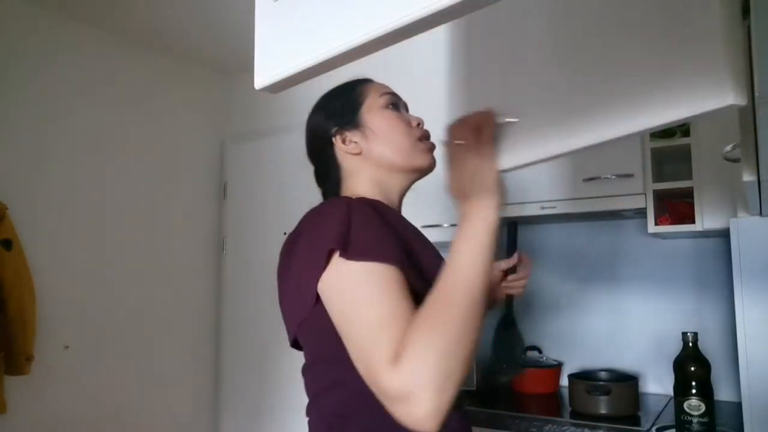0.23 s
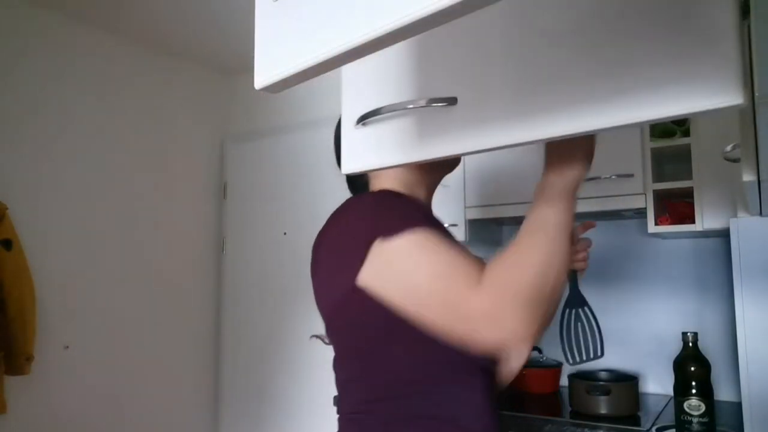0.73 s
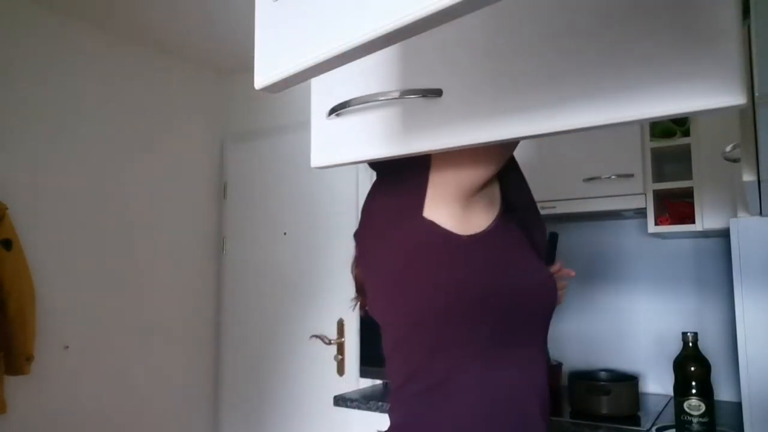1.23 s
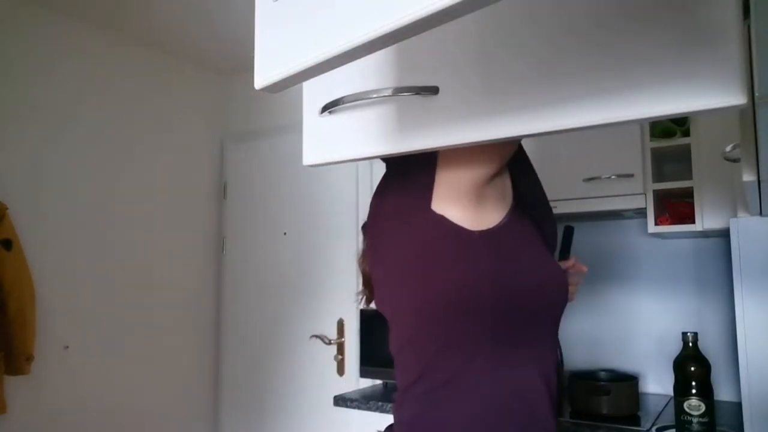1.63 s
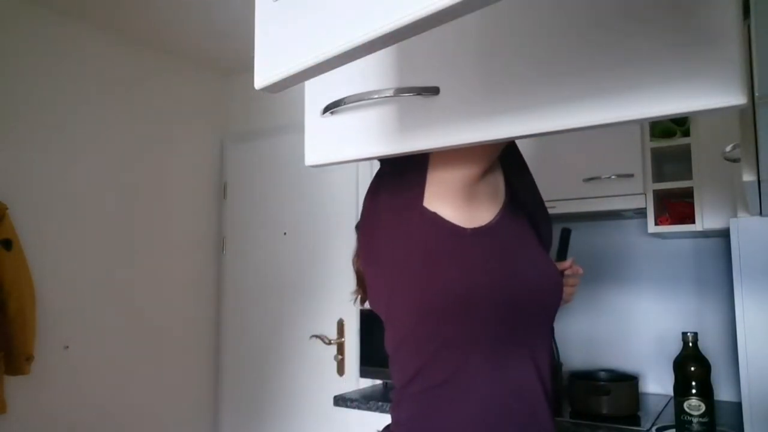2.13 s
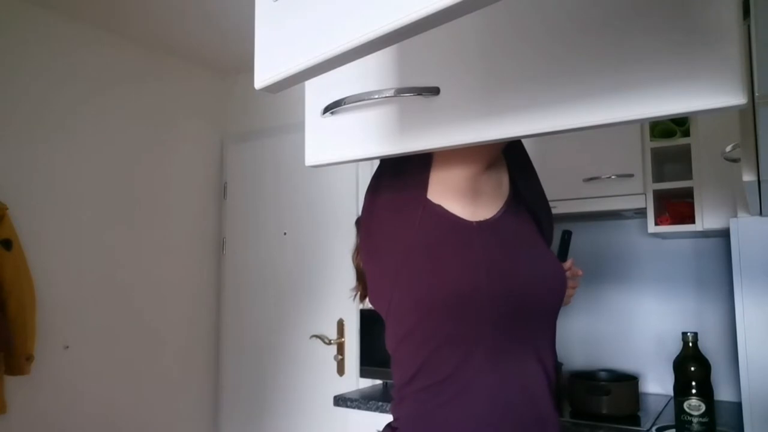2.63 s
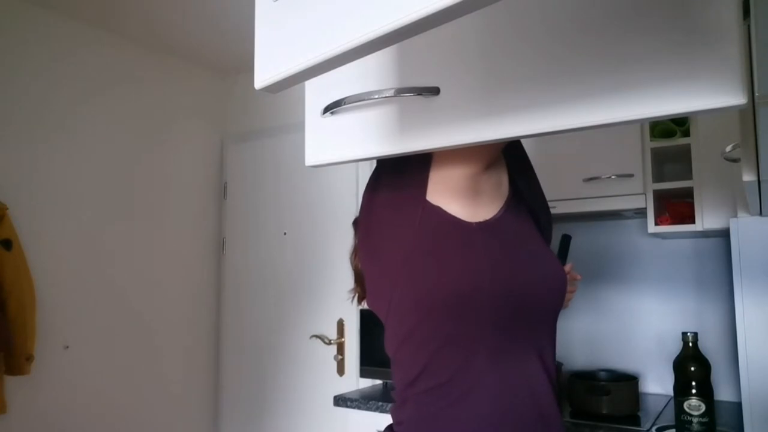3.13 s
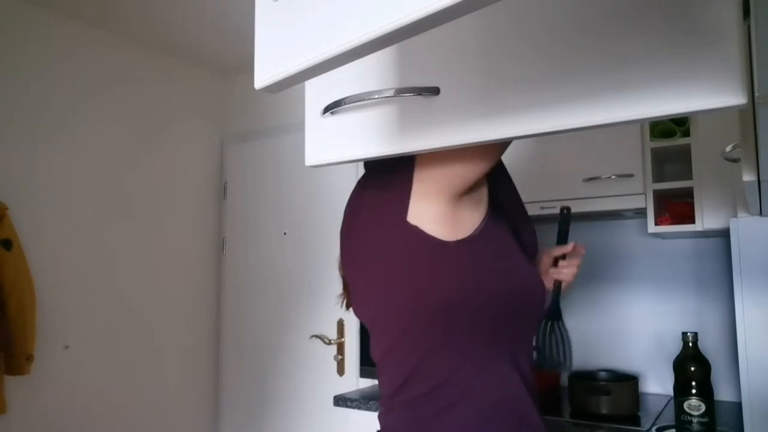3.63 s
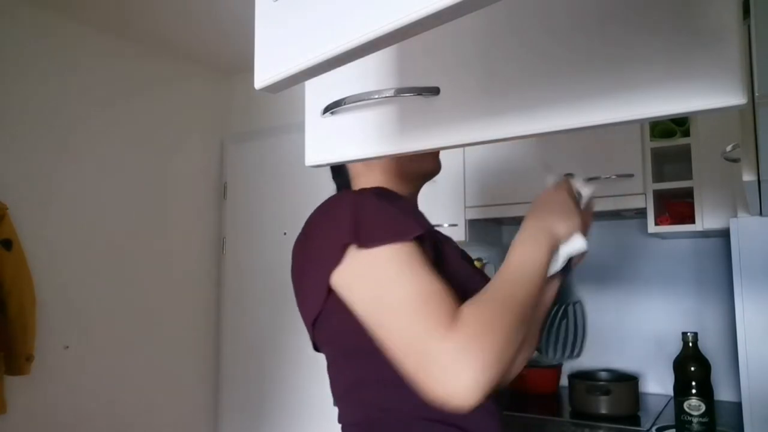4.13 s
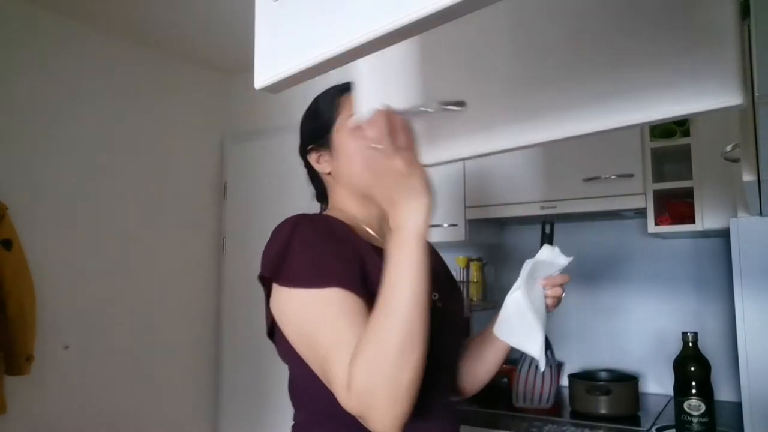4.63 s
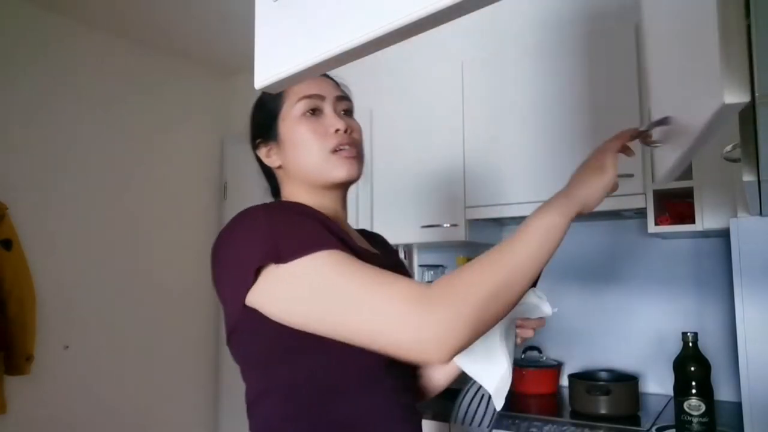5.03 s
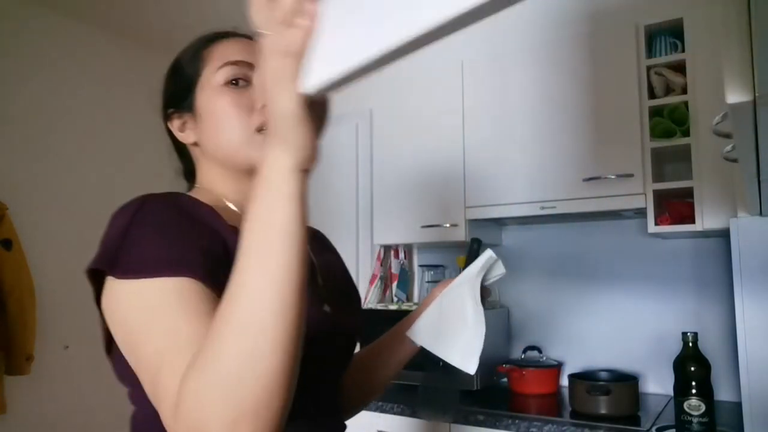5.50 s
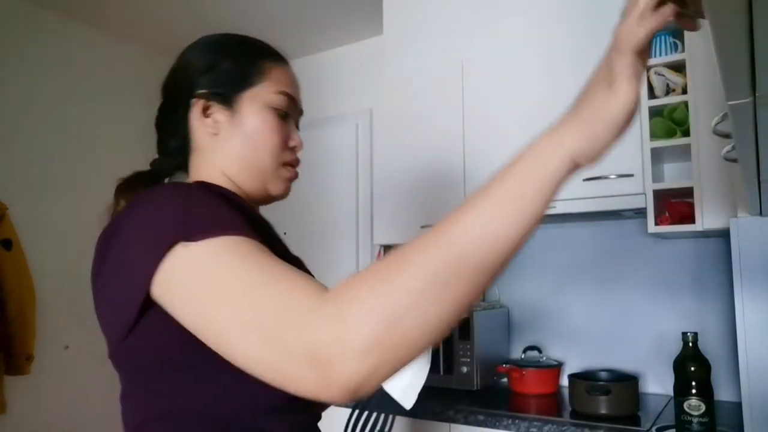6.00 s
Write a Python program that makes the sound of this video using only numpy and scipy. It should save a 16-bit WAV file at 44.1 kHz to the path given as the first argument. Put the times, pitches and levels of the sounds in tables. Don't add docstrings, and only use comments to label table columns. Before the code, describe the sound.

Quiet kitchen with fridge hum; a cupboard catch snaps, paper towel rustles and tears, knuckles tap a door, then two cupboard doors slam very loudly.

```python
import sys
import numpy as np
from scipy import signal
from scipy.fft import rfft, irfft, next_fast_len
from scipy.io import wavfile
from scipy.ndimage import uniform_filter1d, map_coordinates

SR = 44100
rng = np.random.default_rng(int(sys.argv[2]) if len(sys.argv) > 2 else 0)


def makeup_ratio(level_db):
    decades = np.asarray(level_db, float) / 20
    return 10 ** decades


def digitize_waveform(pressure):
    field = np.atleast_2d(pressure).T
    bounded = np.clip(field, -1, 1)
    quanta = np.round(bounded * 32767).astype(np.int16)
    wavfile.write(sys.argv[1], SR, quanta)


N = 276066

# start_s, level_db, push_ms, crack_db
TAP_CONTACTS = [
    (4.621, -33, 0.12, -40),
    (4.641, -30.5, 0.23, -32),
    (4.665, -27, 0.64, -26),
    (4.695, -30, 0.64, -32),
]
SLAM_1_CONTACTS = [(5.368, -48, 0.12, -13), (5.381, -19, 0.38, -25), (5.394, -6, 0.25, -14),
                   (5.4015, -1.5, 0.39, -9), (5.42, -23.5, 0.11, -6), (5.455, -12, 0.33, -9),
                   (5.49, -21.5, 0.24, 1.5), (5.587, -19.5, 0.33, -9.5), (5.64, -13.5, 3.2, -41)]
SLAM_2_CONTACTS = [(5.915, -43.5, 0.25, 10), (5.93, -40.5, 0.63, -10), (6.004, -25, 1, -16),
                   (6.011, -40, 0.4, -18), (6.0178, -3, 0.14, -6.5), (6.0275, -10.5, 0.25, -32),
                   (6.063, -23.5, 0.42, -7), (6.098, -31, 0.46, -17), (6.128, -14, 0.4, -3),
                   (6.137, -24.5, 0.13, -8), (6.19, -20, 0.4, -6)]
# pitch_hz, level_db, t60_s
LIFT_DOOR_MODES = [(83.4, -4.5, 0.37), (113, -6, 0.41), (185, 3, 0.64), (235, -5.5, 0.5), (287, -11, 0.25),
                   (470, -1, 0.38), (559.6, 9, 0.3), (624, 6, 0.23), (940, -5, 0.27)]
# pitch_hz alone, then level_db, t60_s
DOOR_1_PITCHES = [58.5, 116, 173, 249, 300, 360, 467, 495, 535, 634, 694, 829, 915, 964, 1260, 1696]
DOOR_1_RINGS = [(6, 0.28), (-8, 0.65), (4, 0.38), (-18, 0.57), (-9, .3), (-15, 0.4), (-4.5, 0.64),
                (-12, 0.36), (-12.5, 0.69), (-7.5, .45), (-7, 0.46), (-1, 0.15), (-12, .5), (-18, 0.57),
                (0.5, 0.29), (-4.5, 0.38)]
DOOR_2_PITCHES = [54, 75, 114, 152, 182, 278, 347, 430, 483, 602, 664, 872, 940, 1300, 1669]
DOOR_2_RINGS = [(-1.5, 1), (-2, 0.11), (9.5, 0.17), (-2, 1), (-3.5, 0.39), (-4, 0.42), (4.5, 0.078),
                (-5.5, 0.31), (-17, 0.7), (1.5, 0.13), (-11, .35), (-7.5, 0.2), (0.5, 0.058), (1.5, 0.046),
                (-5, 0.17)]
# frequency_hz, t60_s
DENSE_MODES = [(40, -37), (60, -6), (120, 3.5), (400, -15.5), (1000, -18), (2500, -10.5), (5000, -56)]
DENSE_DECAY = [(60, 0.083), (500, 0.67), (2000, 0.093)]
# frequency_hz, t60_s
EDGE_CRACK = [(300, 2), (900, 6.5), (1900, 1), (3000, -2.5), (4500, -15), (6000, -24.5), (8000, -23),
              (12000, -25), (16000, -53)]
EDGE_CRACK_DECAY = [(1000, 0.36), (3000, 0.32), (6000, 0.47), (12000, 0.19)]
# frequency_hz, left_right_db
DOOR_DIFFERENCE = [(60, -15), (200, -13.5), (500, -4), (1500, 3)]
DOOR_BALANCE = [(300, -1), (700, -1.5), (1400, -1.5), (2500, 3.5), (5000, 3.5), (9000, -1)]

# start_s, level_db, rise_s, t60_s, left_right_db
CATCH_SNAP = [(.3065, -27.5, 0.002, 0.31, 2)]
CATCH_RING_ON = [(.31, -25, 0.013, 0.71, 2)]
HANDLE_SNAP = [(4.641, -28, 0.00062, 0.45, 0)]
KNUCKLE_SNAP = [(4.621, -30.5, 0.0023, 0.153, 0)]
HINGE_SNAPS = [
    (5.128, -35.5, 0.0021, 0.55, 0.0078),
    (5.19, -46, 0.0037, 0.58, 0.0055),
]
TICK_SNAPS = [
    (1.765, -52, .0005, 0.057, 0),
    (4.934, -49, .0005, 0.054, 0),
    (5.588, -40, .002, 0.11, 0),
    (6.018, -39, .0003, .03, 0.0026),
]
# centre_hz, width_hz, level_db
CATCH_RESONANCES = [(1336, 200, 10), (1690, 540, 11), (1840, 420, 1.5), (2060, 190, 10), (3600, 650, 3),
                    (5500, 480, -13), (4440, 830, -38), (7060, 520, -3), (8230, 490, -5),
                    (10100, 980, -10.5), (11300, 1200, -9), (13600, 1500, -24.5)]
HANDLE_RESONANCES = [(1320, 210, -5), (1700, 1100, -2.5), (2480, 300, -1.5), (4270, 1300, -14.5),
                     (10400, 2700, -25)]
HINGE_RESONANCES = [(228, 140, 13.5), (740, 430, 7), (1810, 370, 6.5), (2690, 670, 1.5), (3520, 400, -3),
                    (6000, 2000, -17.5)]
# pitch_hz, level_db, t60_s
SPRING_MODES = [(1254, -14, 0.22), (1534, -4, 0.27), (1710, -10, 0.6), (1720, -7, 0.28), (1800, -3, 2.1),
                (1880, -11, 0.24), (2035, -4, 0.32), (2153, -13, 0.47), (2439, -6, 0.31), (2923, -24, 0.72),
                (3450, -19, 0.7), (3530, -17, 0.22), (3700, -13, 0.49), (3940, -20, 0.5)]
HANDLE_BAR_MODES = [(990, -6, .15), (1265, -6, .25), (1620, 6, 0.16), (1730, -9, .25), (2073, -6, .1),
                    (2396, -4, .25)]

# peak_s, level_db, swell_s, fade_s, body_db; swell_s and fade_s last 20 dB
TEAR_STROKES = [(1.33, -50.5, 0.022, 0.14, -4.5), (1.392, -43, 0.067, 0.12, -6),
                (1.535, -45, 0.022, 0.22, -10.5), (1.572, -40.5, 0.079, 0.093, -15),
                (1.70, -51.5, 0.057, 0.077, -17), (1.755, -45, 0.014, 0.11, -22),
                (1.79, -42, 0.026, 0.14, -9), (1.915, -53, 0.056, 0.042, -24),
                (3.075, -67.5, 0.061, 0.07, 1), (3.14, -53, 0.017, 0.094, -20),
                (3.345, -53, .03, 0.25, -10), (3.41, -45.5, 0.087, 0.21, -3),
                (3.48, -45.5, 0.098, 0.12, -4.5), (3.58, -45.5, 0.1, 0.21, -5.5),
                (3.69, -49.5, 0.14, 0.16, -15), (3.87, -62, 0.062, 0.079, 1), (3.98, -64, 0.22, 0.1, 4.5),
                (4.13, -67, 0.034, .1, 11.5), (4.21, -52.5, 0.13, 0.1, 2), (4.31, -44.5, 0.12, 0.17, -5.5),
                (4.4, -52, 0.15, 0.047, -11), (4.94, -62.5, 0.059, 0.23, -9)]
SWISH_STROKES = [(.01, -53.5, 0.17, 0.18, -0.5), (.21, -70, 0.097, 0.041, 14.5),
                 (.26, -62.5, 0.075, 0.13, 1.5), (.478, -49.5, 0.044, 0.12, -0.5),
                 (.56, -55, 0.26, 0.083, -3.5), (.735, -73.5, 0.036, 0.073, 18),
                 (2.03, -63, 0.051, 0.068, -3), (3.8, -69, 0.16, 0.082, 14.5), (4.85, -61, 0.086, 0.25, -4),
                 (5.72, -65.5, 0.048, 0.21, 10.5), (5.85, -50, 0.24, 0.23, -12),
                 (5.926, -46.5, 0.081, 0.058, -6), (6.0, -53, 0.11, 0.045, 6)]
# frequency_hz, density_db_per_hz
PAPER_SPECTRUM = [(900, -58), (1500, -10.5), (2000, 1), (3100, 4.5), (4000, 4.5), (4900, 6.5), (5400, -13),
                  (6500, -70)]
BODY_SPECTRUM = [(150, -53), (350, -7), (700, -4.5), (1500, -4.5), (2200, -11), (3500, -32)]
TOP_SPECTRUM = [(4200, -58), (5300, 2), (7000, 4), (8000, 0.5), (10000, 0), (12000, -3.5), (13000, -16),
                (15000, -19), (16000, -29)]
CLOTH_SPECTRUM = [(590, -38), (1000, 1), (1380, -1), (1520, -1.5), (2630, 9), (2790, 8.5), (8000, -16.5),
                  (10400, -45), (17600, -120)]
# frequency_hz, left_right_db
PAPER_BALANCE = [(1000, 2.2), (5000, 3), (9000, -1)]

# peak_s, strength_db, swell_s, fade_s
CUP_SHAKES = [
    (5.51, -38.5, 0.11, 0.13),
    (5.575, -47.5, 0.06, 0.1),
    (6.09, -38, 0.05, 0.21),
    (6.165, -45.5, 0.23, 0.3),
    (6.21, -52, .04, .25),
]
# centre_hz, width_hz, level_db
CUP_MODES = [(2800, 25, -2), (2920, 60, -10), (3030, 45, -1), (3120, 40, 0), (3210, 60, -6),
             (3320, 60, -11), (3600, 60, -6), (3710, 50, -7), (4020, 40, -13)]
GLASS_MODES = [
    [(4624, 14, -10), (5176, 10, 0), (5572, 12, -7)],
    [(7550, 22, 0), (7973, 20, -9), (8200, 30, -21)],
]
# start_s, end_s, wide_glass_db, thin_glass_db
GLASS_TOUCHES = [(5.463, 5.5, -67, -51), (5.495, 5.544, -51.5, -49), (5.548, 5.602, -55, -62),
                 (6.087, 6.12, -49, -47), (6.135, 6.209, -54, -49), (6.205, 6.255, -63, -64)]
# start_s, length_s, pitch_hz, level_db
HOLLOWS = [
    (1.529, 0.13, 453, -53),
    (5.869, 0.078, 517, -49),
]
# start_s, pitch_hz, level_db, t60_s
SHELF_THUDS = [(0.0, 151, -32.5, 0.16), (0.071, 111.2, -37.5, 0.56), (.11, 139.3, -37.5, 0.44),
               (0.201, 350, -49, 0.1), (0.721, 235, -42.5, 0.3), (0.76, 100, -43, 0.26),
               (0.901, 322, -53.5, 0.68), (1.071, 310, -49, 0.13), (1.299, 217, -46, 0.33),
               (1.79, 134, -66, 0.17), (3.402, 210.3, -41, 0.34), (3.491, 196, -47, 0.29),
               (3.77, 217, -41.5, 0.28), (3.831, 197, -47, 0.21), (3.829, 347, -49, 0.25),
               (4.2, 542, -44, 0.25), (5.131, 132.6, -40, 0.32), (5.138, 237.4, -44, 0.15),
               (5.186, 470, -45, 0.16), (5.204, 121, -36, 0.11), (5.25, 73.4, -41, 0.18)]
# frequency_hz, t60_s
KITCHEN_DECAY = [(100, 0.31), (1000, 0.23), (4000, 0.13), (12000, 0.085)]

# time_s, pitch_hz, level_db
COMPRESSOR_RUMBLE = [(0.0, 48.4, -36.5), (0.47, 45.8, -49), (0.72, 45.7, -38.5), (1.58, 43.8, -49),
                     (2.23, 39.5, -38.5), (2.6, 41.5, -49.5), (3.08, 44.4, -55), (3.17, 47, -67),
                     (3.47, 43, -46), (3.57, 44, -63), (3.69, 45.4, -49), (3.76, 46.6, -64),
                     (3.94, 43.2, -56), (4.77, 41.8, -53.5), (4.93, 46, -55), (5.3, 49.9, -53)]
SHAKEN_CABINET = [
    (5.7, 47.4, -43.5),
    (6.3, 49, -35),
]
# time_s, pitch_hz, level_db
FRIDGE_HUM = [(0, 163, -63), (.8, 156.9, -57.5), (1.5, 154.1, -60), (2, 152.4, -53.5), (2.7, 149.8, -66),
              (3.5, 154, -52.5), (4, 156.4, -57), (4.5, 162.7, -67), (5.3, 163, -64)]
# frequency_hz, density_db_per_hz
AIR_HISS = [(30, -42.5), (50, -19.5), (75, -19), (110, -17.5), (170, -17), (250, -23), (600, -26),
            (1000, -28), (1600, -33.5), (2500, -36), (4800, -42), (5600, -48.5), (12000, -52.5),
            (15800, -57)]
# frequency_hz, correlation
HISS_LIKENESS = [(60, 0.45), (180, 0.8), (550, 0.39), (1650, -0.18), (4970, 0.016), (15000, -0.09)]


def panel(contacts, modes, dense_db):
    body, cracks = np.zeros((2, N)), np.zeros((2, N))
    t = np.arange(SR) / SR

    def ring():
        total = 0
        for k, (hz, level_db, t60) in enumerate(modes):
            envelope = makeup_ratio(level_db + rng.normal() - 60 * t / t60)
            total = total + (-1) ** k * envelope * np.sin(2 * np.pi * hz * t)
        return total

    for s, db, push_ms, crack_db in contacts:
        push = t[:600] * np.exp(-1000 * t[:600] / push_ms)
        push = push[None] / push.sum()
        mid_side = 0.5 * np.array([ring(), 0.54 * ring()]) + makeup_ratio(dense_db) * tail(DENSE_DECAY, DENSE_MODES)
        add(body, s, makeup_ratio(db) * signal.fftconvolve(mid_side, push, axes=1)[:, :SR])
        # 0.33 dB per octave above 3 kHz, per dB of lost strength
        colour = [(hz, g + 0.33 * db * max(np.log2(hz / 3000), 0)) for hz, g in EDGE_CRACK]
        add(cracks, s, makeup_ratio(db + crack_db + 22) * tail(EDGE_CRACK_DECAY, colour))
    side = filtered(body[1], lambda f: makeup_ratio(along(DOOR_DIFFERENCE, f)))
    return body[0] + np.array([side, -side]) + cracks


def doors():
    door_1 = [(hz, *ring) for hz, ring in zip(DOOR_1_PITCHES, DOOR_1_RINGS)]
    door_2 = [(hz, *ring) for hz, ring in zip(DOOR_2_PITCHES, DOOR_2_RINGS)]
    x = panel(TAP_CONTACTS, LIFT_DOOR_MODES, dense_db=26.5)
    x += panel(SLAM_1_CONTACTS, door_1, dense_db=24.5)
    x += panel(SLAM_2_CONTACTS, door_2, dense_db=27)
    return balanced(x, DOOR_BALANCE)


def click(events, resonances):
    t, x = np.arange(SR // 2) / SR, np.zeros((2, N))
    for s, db, rise, t60, pan_db in events:
        burst = rng.standard_normal((2, len(t))) * makeup_ratio(np.array([[pan_db / 2], [-pan_db / 2]]))
        decay = makeup_ratio(db + 0.5 - 60 * t / t60) + makeup_ratio(db + 4 - 60 * t / 0.019)
        add(x, s, burst * decay * (1 - np.exp(-t / rise)))
    return resonant(x, resonances)


def struck(s, db, rise, modes):
    t, out = np.arange(SR // 2) / SR, np.zeros((2, N))
    for hz, level_db, t60 in modes:
        phase = 2 * np.pi * rng.random() + rng.normal(size=(2, 1))
        envelope = makeup_ratio(db + level_db - 60 * t / min(t60, 0.7)) * (1 - np.exp(-t / rise))
        add(out, s, envelope * np.sin(2 * np.pi * hz * t + phase))
    return out


def small_parts():
    x = click(CATCH_SNAP, CATCH_RESONANCES) + click(CATCH_RING_ON, [(1750, 380, 0.016)])
    x += struck(0.39, -48, 0.0025, SPRING_MODES)
    x += click(HANDLE_SNAP, HANDLE_RESONANCES)
    x += click(KNUCKLE_SNAP, [(1300, 430, 10.5), (1670, 600, -6)])
    x += struck(4.641, -43.5, 0.002, HANDLE_BAR_MODES)
    x += click(HINGE_SNAPS, HINGE_RESONANCES)
    return x + click(TICK_SNAPS, [(5000, 3100, -1.5), (10900, 8600, -14)])


def rustle():
    power = np.zeros((4, N))
    for strokes, paper_db, cloth_db, top_db in [(TEAR_STROKES, 0, -99, -4.5), (SWISH_STROKES, -8, 0, -12)]:
        for s, db, swell, fade, body_db in strokes:
            crisp_db = 3.5 * (3 < s < 4.05)
            gains = makeup_ratio(np.array([[paper_db], [cloth_db], [body_db], [top_db + crisp_db]]))
            power += (swells(s, db, swell, fade) * gains) ** 2
    paper, cloth, body, top = uniform_filter1d(np.sqrt(power), size=600)

    snapping = rng.random((2, N)) < 2500 / SR
    snaps = snapping * rng.standard_normal((2, N)) * makeup_ratio(2.6 * rng.random((2, N)))
    source = unit(snaps) * 0.5 + rng.standard_normal((2, N))
    source *= makeup_ratio(0.55 * wobble(40) + 0.53 * wobble(140))
    z = signal.stft(source, nperseg=256)[2]
    folds = uniform_filter1d(rng.standard_normal(z.shape[1:]), size=6, axis=0)
    folds = uniform_filter1d(folds, size=10, axis=1)
    source = signal.istft(z * makeup_ratio(1.93 * unit(folds)), nperseg=256)[1][:, :N]

    def band(spectrum):
        return unit(filtered(source, lambda f: makeup_ratio(along(spectrum, f))))

    x = paper * band(PAPER_SPECTRUM) + cloth * band(CLOTH_SPECTRUM)
    x += body * band(BODY_SPECTRUM) + top * band(TOP_SPECTRUM)
    x = pair(makeup_ratio(3) * x, [(300, 1.0), (1500, 0.024), (5000, 0.031)])
    return balanced(x, PAPER_BALANCE)


def crockery():
    t = np.arange(N) / SR

    def chatter(modes):
        touches = (rng.random(N) < 900 / SR) * rng.standard_normal((2, N))
        return unit(resonant(touches, modes))

    out = sum(swells(*shake) for shake in CUP_SHAKES) * chatter(CUP_MODES)
    clear = 0.7
    for k, modes in enumerate(GLASS_MODES):
        touching = np.max([makeup_ratio(row[2 + k]) * ((t > row[0]) & (t < row[1])) for row in GLASS_TOUCHES], axis=0)
        ears = np.array([[0], [1]])
        tone = unit(sum(makeup_ratio(g) * np.sin(2 * np.pi * hz * t + ears) for hz, _, g in modes))
        singing = clear * tone + np.sqrt(1 - clear ** 2) * chatter(modes)
        out += uniform_filter1d(touching, size=900) * singing
    for s, length, hz, db in HOLLOWS:
        swell = np.hanning(round(length * SR))
        add(out, s, makeup_ratio(db) * swell * np.sin(2 * np.pi * hz * t[:len(swell)]))
    return out


def thuds():
    out, t = np.zeros((2, N)), np.arange(SR // 2) / SR
    for s, hz, db, t60 in SHELF_THUDS:
        beat = 1 + 0.5 * np.sin(2 * np.pi * (hz * 0.091 * t + rng.random()))
        envelope = makeup_ratio(db - 60 * t / t60) * (1 - np.exp(-t / 0.0057))
        add(out, s, envelope * beat * np.sin(2 * np.pi * hz * t))
    return out


def fridge():
    t = np.arange(N) / SR

    def curves(rows):
        time, *columns = np.transpose(rows)
        return [np.interp(t, time, column) for column in columns]

    def line(hz):
        return np.sqrt(2) * np.sin(2 * np.pi * np.cumsum(hz) / SR) * makeup_ratio(0.24 * wobble(20))

    def narrow(hz, width_hz):
        return unit(filtered(rng.standard_normal(N), lambda f: 1 / (1 + ((f - hz) / width_hz) ** 2)))

    rumble_hz, rumble_db = curves(list(COMPRESSOR_RUMBLE) + list(SHAKEN_CABINET))
    hum_hz, hum_db = curves(FRIDGE_HUM)
    x = makeup_ratio(rumble_db + 1.2 * wobble(8.2)) * line(rumble_hz + 0.8 * wobble(1.9))
    x += makeup_ratio(hum_db + 1.5 * wobble(9.2)) * line(hum_hz + 1.75 * wobble(20))
    x += makeup_ratio(-60 + 1.6 * wobble(2.7)) * line(hum_hz / 2 + 2 * wobble(6.9))
    return x + makeup_ratio(-65.5) * narrow(101.2, 1.8) + makeup_ratio(-71) * narrow(626, 3.3) + makeup_ratio(-72) * narrow(349.3, 1)


def air_hiss():
    hiss = unit(filtered(rng.standard_normal((2, N)), lambda f: makeup_ratio(along(AIR_HISS, f))))
    hiss *= makeup_ratio(0.5 * wobble(4))
    return makeup_ratio(-53) * pair(hiss, HISS_LIKENESS) * makeup_ratio(np.array([[0.8], [-0.8]]))


def unit(x):
    return x / np.sqrt(np.mean(x ** 2) + 1e-20)


def along(points, hz):
    f, v = np.transpose(points)
    return np.interp(np.log(hz + 1), np.log(f + 1), v)


def wobble(rate):
    return map_coordinates(rng.standard_normal(int(N * rate / SR) + 4), [np.arange(N) * rate / SR])


def swells(s, db, swell, fade):
    t = np.arange(N) / SR - s
    return makeup_ratio(np.maximum(db - 20 * np.where(t < 0, -t / swell, t / fade), -150))


def filtered(x, response):
    m = next_fast_len(N + SR)
    return irfft(rfft(x, m) * response(np.fft.rfftfreq(m, 1 / SR)), m)[..., :N]


def resonant(x, modes):
    def response(f):
        return sum(makeup_ratio(g) * (1j * f * w / (c * c - f * f + 1j * f * w)) ** 2 for c, w, g in modes)
    return filtered(x, response)


def balanced(x, points):
    return filtered(x, lambda f: makeup_ratio(np.outer([0.5, -0.5], along(points, f))))


def pair(x, alike):
    def rotation(hz):
        angle = np.arccos(np.clip(along(alike, hz), -1, 1)) / 2
        return np.array([np.cos(angle), np.sin(angle)])
    mid, side = filtered(x, rotation)
    return np.array([mid + side, mid - side])


def tail(t60, colour=((1, 0),)):
    hz, t, z = signal.stft(rng.standard_normal((2, SR)), SR, nperseg=256)
    decay_db = along(colour, hz)[:, None] - 60 * t / along(t60, hz)[:, None]
    x = signal.istft(z * makeup_ratio(decay_db), SR, nperseg=256)[1]
    return x[:, :SR] / np.linalg.norm(x[0])


def add(track, s, x):
    i = round(s * SR)
    track[..., i:i + x.shape[-1]] += x[..., :N - i]


def scene():
    near = rustle() + crockery()
    walls = signal.fftconvolve(near, tail(KITCHEN_DECAY), axes=1)[:, :N]
    return doors() + small_parts() + near + makeup_ratio(-7.5) * walls + thuds() + fridge() + air_hiss()


def roll_off(x):
    return signal.sosfilt(signal.butter(12, 15750, fs=SR, output="sos"), x)


def record(dry):
    x = signal.sosfilt(signal.butter(4, 40, "highpass", fs=SR, output="sos"), dry)
    clipped = x / (1 + np.abs(x) ** 30) ** (1 / 30)
    return roll_off(clipped)


dry = scene()
out = record(dry)
digitize_waveform(out)
```